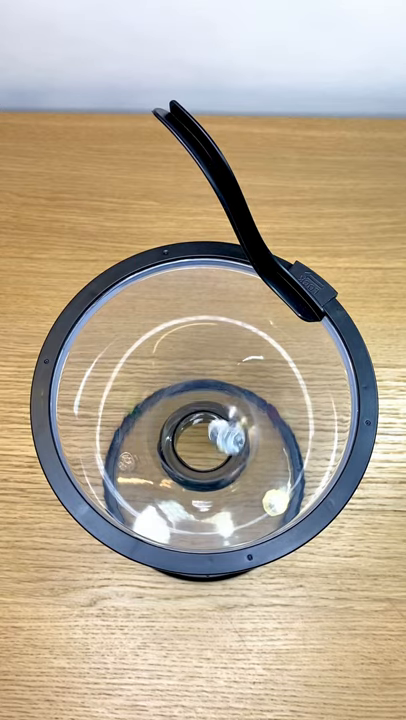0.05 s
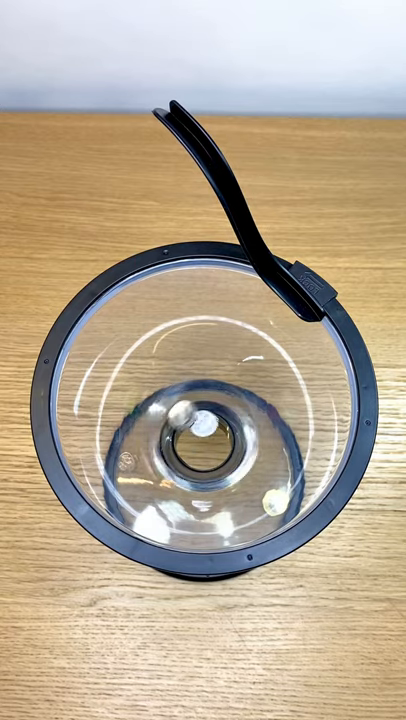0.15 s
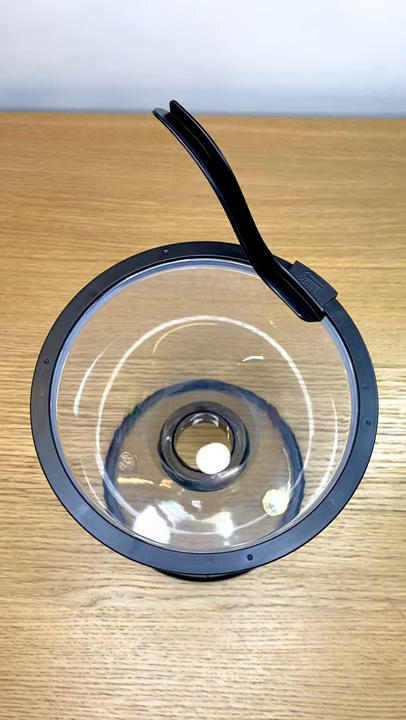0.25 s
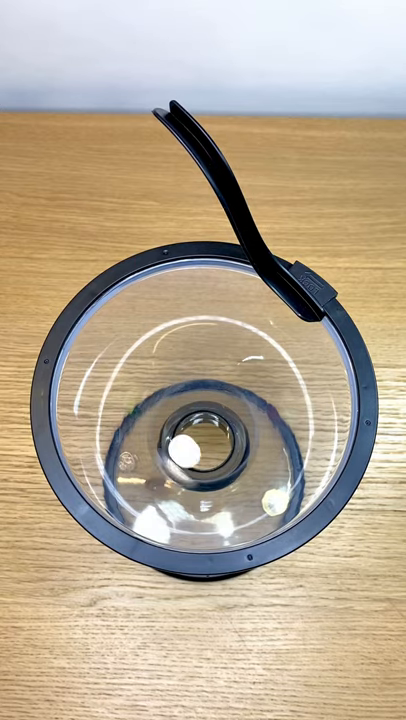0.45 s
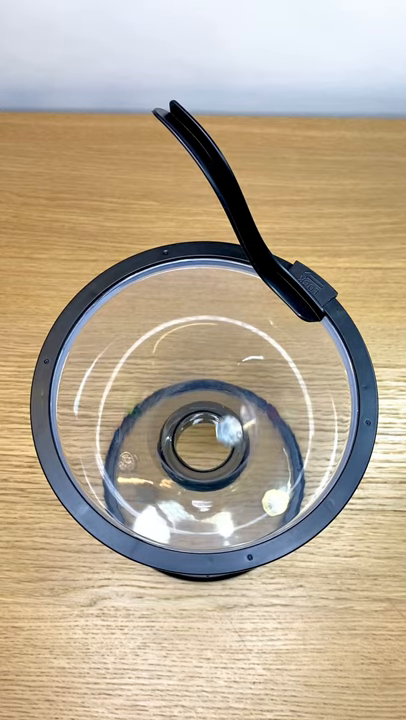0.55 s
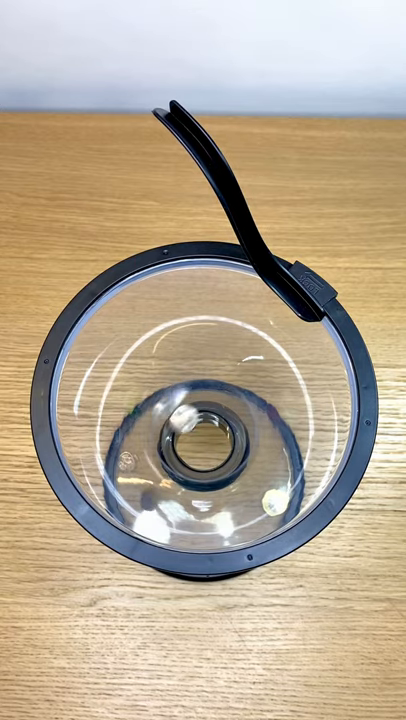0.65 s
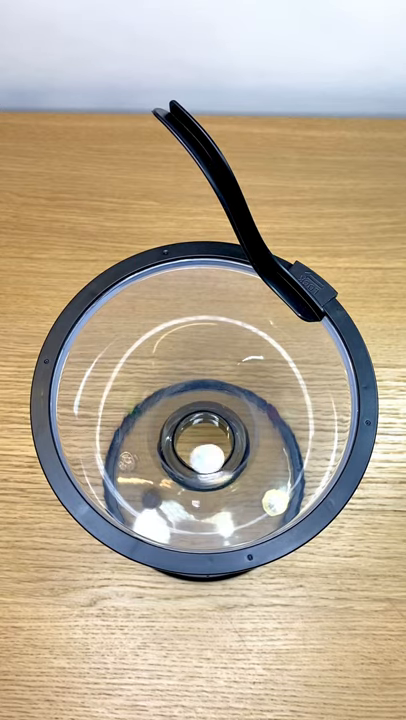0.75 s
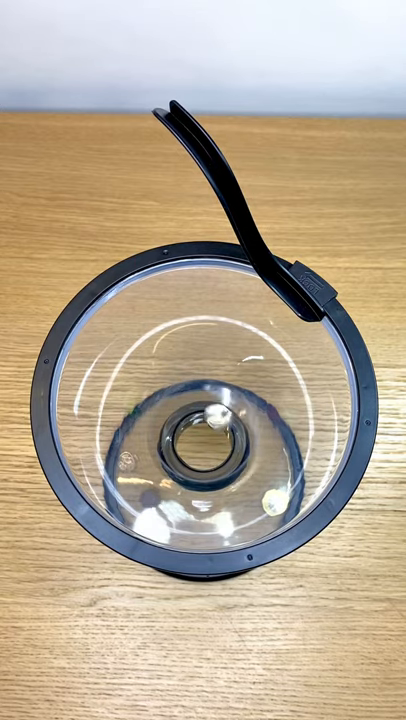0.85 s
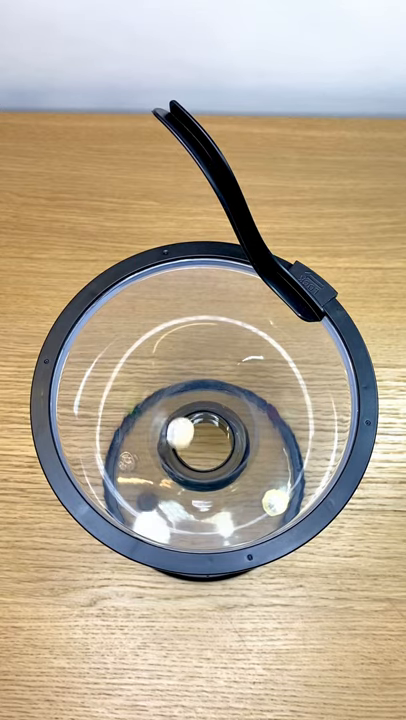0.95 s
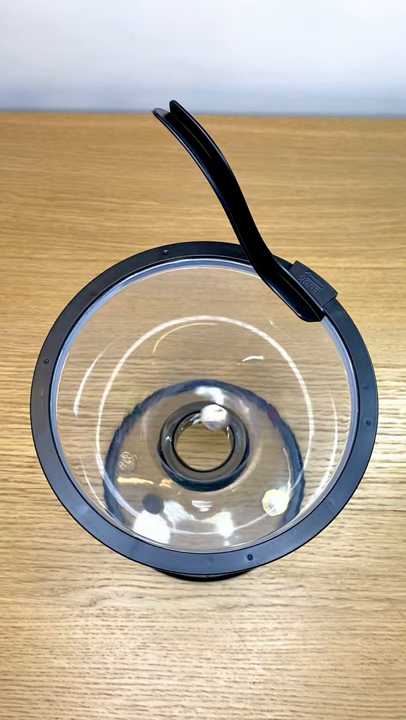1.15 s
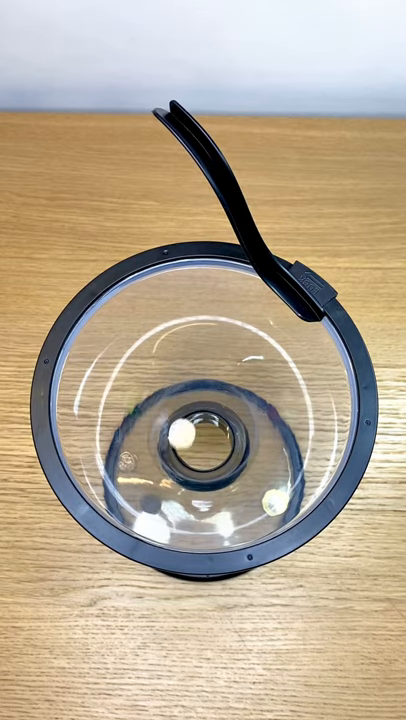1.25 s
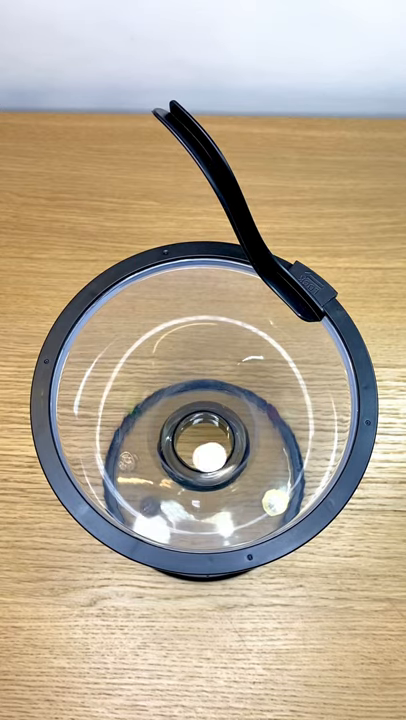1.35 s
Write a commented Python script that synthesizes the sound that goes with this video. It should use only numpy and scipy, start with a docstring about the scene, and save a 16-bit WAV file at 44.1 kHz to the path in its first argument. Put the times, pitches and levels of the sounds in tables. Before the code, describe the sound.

Steady rasping whirr of a coin circling in a plastic funnel, clicks, then a table thud.

```python
"""On a wooden table in a room, a coin circles the throat of a plastic funnel bank.
Rim contacts, as random impulses, drive resonant modes that whirr and sing; the coin rasps once per turn
and wobbles, with a gliding low hum. Early on the plastic clicks sharply, then the bank knocks on the
table: blows ring the modes with decaying noise bands, and the table top booms as decaying cosines."""
import sys
import numpy as np
from scipy import signal
from scipy.fft import rfft, irfft
from scipy.io import wavfile
from scipy.ndimage import uniform_filter1d, map_coordinates

SR = 44100
rng = np.random.default_rng(int(sys.argv[2]) if len(sys.argv) > 2 else 0)


def digitize_waveform(pressure):
    """Quantize a signal to 16-bit integers and store it at the path in sys.argv[1].

    Rows of a 2-D input are taken as channels; values are limited to [-1, 1].
    """
    field = np.atleast_2d(pressure).T
    bounded = np.clip(field, -1, 1)
    quanta = np.round(bounded * 32767).astype(np.int16)
    wavfile.write(sys.argv[1], SR, quanta)


N = 61739
T = np.arange(N) / SR

# Diffuse reflections of the room
ROOM_DB, ROOM_T60_S, ROOM_LOW_HZ = -8, 0.07, 292
ROOM_TREBLE_DB, ROOM_TREBLE_HZ = -0.5, 2000   # slight loss above this corner

# Modes of the table top: mode_hz, t60_s, level_db
TABLE_MODES = [(102.8, 0.41, -8), (117.9, 0.58, -19), (126.8, 0.32, -17), (284.2, .12, -16)]
# Blows that set the table booming: start_s, level_db
BOOMS = [(.155, -34.5), (0.233, -29.5), (0.3584, 2)]
BOOM_RISE_S = 0.01348
# Spectrum of the table's rumble under the rolling: frequency_hz, density_db (per Hz)
RUMBLE_SPECTRUM = [(30, -34), (65, -24), (92, 7.5), (130, -5.5), (160, -21.5), (200, -5.5), (300, -25.5)]
RUMBLE_DB = -50

# Funnel modes: mode_hz, t60_s (ringing freely), rolling_db, click_db, knock_db
FUNNEL_MODES = [(584, 0.2, -8.5, -36.5, -9.5), (687.4, 0.13, -10.5, -18, -8.5),
                (871.8, 0.2, -11.5, -23.5, -45), (966.5, 0.14, -9.5, -36, -14),
                (1060, 0.21, -42, -36, -11.5), (1187, 0.023, -23, -45, -1), (1842, 0.075, -11, -49, -34),
                (1919.5, 0.072, -2.5, -36, -34), (2028, 0.047, -5.5, -33, -28),
                (2331, 0.1, -12.5, -13, -38), (2638, 0.088, -18.5, -13.5, -25), (2876, 0.026, -23, -2, 1.5),
                (3086, 0.046, -16.5, -37, -5), (4080, 0.033, -22.5, -7, -21), (4590, 0.034, -18, -8, -27),
                (5346, 0.021, -30.5, -3, -18), (6464, 0.015, -32, 1.5, -6), (7260, 0.018, -36, -11, -26),
                (9750, 0.033, -43, -13, -18)]

# Sharp clicks on the plastic: start_s, level_db, hardness_hz (contact low-pass corner)
CLICKS = [(.1392, -23.5, 9150), (.1655, -22, 2000), (.2277, -10.5, 15000), (.2503, -17, 4950),
          (.2522, -14.5, 4440)]
# Spectrum of the short modes in a click: frequency_hz, density_db (per Hz)
CLICK_SPECTRUM = [(200, -15), (1300, -26), (2400, 10), (3500, -1.5), (5800, -1.5), (7800, -4), (10000, 1.5),
                  (14000, -25)]
CLICK_T60_S, CLICK_TAIL_DB, CLICK_TAIL_T60_S = 0.021, -35, 0.093   # decays at 2 kHz
# Knocks of the bank on the table: start_s, level_db, hardness_hz (contact low-pass corner)
KNOCKS = [(.3542, -14.5, 5960), (.3635, -19.5, 3540), (.3745, -20, 1200), (.5048, -20.5, 1510),
          (.5122, -20, 1818), (.5187, -26.5, 1490), (.5885, -28.5, 1500)]
# Spectrum of the short modes in a knock: frequency_hz, density_db (per Hz)
KNOCK_SPECTRUM = [(60, -8), (280, -2), (750, -1.5), (1200, 2.5), (2300, -4.5), (2950, -5), (4300, -10.5),
                  (6000, -11), (10000, -11.5), (14000, -31)]
KNOCK_T60_S, KNOCK_TAIL_DB, KNOCK_TAIL_T60_S = 0.038, -8, 0.29   # decays at 2 kHz
DAMPING_SLOPE = 0.37   # ring time falls with frequency by this power
CRACK_DB, CRACK_S = -16, 0.0032   # added level and length of the first contact
THICKET_DB = -1.5   # the short modes of a blow, against the main ones

# Contact of the rolling rim: time_s, whirr_db, treble_db (before the rasps and other offsets)
ROLL = [(0, -37.5, -39.5), (.13, -35, -37.5), (.165, -38, -32), (.205, -39, -45), (.27, -40, -35),
        (.34, -42, -41.5), (.47, -38.5, -42.5), (.6, -37, -42), (.8, -37, -43), (1.0, -39.5, -42.5),
        (1.08, -37, -44.5), (1.4, -40, -43)]
# Level of the singing mode near 2 kHz, before its mode level and wobble: time_s, level_db
SING = [(0, -32.5), (.07, -31.5), (.11, -43), (.17, -34), (.32, -39.5), (.44, -37), (.49, -33.5),
        (.58, -37.5), (.66, -36.5), (.76, -42.5), (.88, -35.5), (.93, -44), (.964, -27.5), (.98, -37),
        (1.036, -46), (1.058, -26), (1.076, -31.5), (1.094, -26), (1.125, -50), (1.19, -33), (1.328, -40),
        (1.347, -28.5), (1.365, -39.5), (1.4, -32.5)]
# Rate at which the coin wobbles on its rim: time_s, rate_hz
WOBBLE = [(0, 32), (.3, 34), (.8, 36.2), (1.12, 29.5), (1.4, 30.6)]
# Pitch of the low hum as the coin goes round: time_s, pitch_hz
HUM = [(0, 623.4), (.12, 590), (.25, 678), (.33, 600), (.7, 575), (.775, 632), (.82, 588), (.88, 634.4),
       (1.07, 623), (1.14, 577.8), (1.18, 628.3), (1.26, 578), (1.4, 625)]
# Brief changes in the rim's scraping: time_s, treble_change_db (negative is softer)
SCRAPES = [(.484, 3), (0.995, -2.5), (1.09, 7.5), (1.228, 2.5)]
# Spectrum of rolling noise through the dense modes: frequency_hz, density_db (per Hz)
WHIRR_SPECTRUM = [(40, -46), (150, -16), (290, -15), (410, -0.5), (520, -5.5), (700, -1.5), (950, -0.5),
                  (1350, -5.5), (1700, 1.5), (2200, -23), (2800, -18), (4000, -22.5), (12000, -52)]
# Spectrum of the rasping treble: frequency_hz, density_db (per Hz)
RASP_SPECTRUM = [(1200, -54), (2300, 4), (3200, 0), (4400, 0.5), (5600, -1.5), (7200, -7), (9500, -9),
                 (11000, -11), (12300, -40), (16000, -66)]
TURN_S, TURN_AT_S = .0585, .872   # one turn of the coin; onset of one rasp
RASP_S, RASP_DB = 0.0072, 6   # a rasp peaks after half this time; its lift above the level between rasps
WOBBLE_DB, SING_WOBBLE_DB, WOBBLE_LAG_S = 4, 4.5, 0.0084   # the singing mode sways more deeply
GRAINS_PER_S, GRAIN_SPREAD_DB = 9000, 3
SCRAPE_LENGTH_S = 0.0095   # from the middle of a change in scraping to 1/e of it
CONTACT_DB, CONTACT_STEP_S = 0.3, .02   # uneven contact of the rim
HUM_DB, HUM_FLUTTER_DB, HUM_JITTER_HZ = -3.5, 3, 7
SING_ABOVE_HZ, SING_BELOW_HZ, GLINT_ABOVE_HZ = 1885, 1970, 2200
GLINT_DB, GLINT_SPREAD_DB = 4, 5.5   # high modes follow the treble, each flaring by chance
DRIVEN_T60_SHARE = 0.55   # share of the free ring time used in each of the two passes
WAVER_SHARE, WAVER_S, WAVER_AT_S = 0.017, .16, 1.012   # pitch waver: depth, period, moment of a crest
LOW_MODES_BELOW_HZ = 800   # these waver twice as fast

# Phase lead of the left port over the right: frequency_hz, phase_rad
PORT_PHASE = [(0, 0), (750, -.4), (1600, .1), (2500, .9), (4000, .8), (4650, 2.1), (5250, 5.9), (5700, 6.8),
              (9650, 8.5), (16000, 10.2)]
# Level of the left port over the right: frequency_hz, difference_db
PORT_BALANCE = [(100, -0.5), (500, 2), (1000, -0.5), (2000, -1.5), (4000, -2.5), (12000, 0.5)]
LOW_CUT_HZ, CUTOFF_HZ = 55, 16300


def from_db(db):
    """Decibel law: 20 dB is a factor of ten in amplitude."""
    return 10 ** (np.asarray(db) / 20)


def rms_one(x):
    """Power normalization: scale to unit rms."""
    return x / np.sqrt(np.mean(x ** 2) + 1e-20)


def in_time(rows):
    """Linear interpolation: each column of a curve at every sample."""
    s, *columns = np.transpose(rows)
    return [np.interp(T, s, c) for c in columns]


def at_hz(points, hz):
    """Logarithmic frequency scale: interpolate a spectrum along it."""
    f, value = np.transpose(points)
    return np.interp(np.log(hz + 1), np.log(f + 1), value)


def chance(step_s):
    """Random modulation: a curve of spread about 1 with a new value every step."""
    return np.interp(T / step_s, np.arange(N), rng.standard_normal(N))


def filtered(x, order, corner_hz, kind):
    """Butterworth filtering: a maximally flat passband."""
    return signal.sosfilt(signal.butter(order, corner_hz, kind, fs=SR, output="sos"), x)


def coloured(x, spectrum):
    """Spectral shaping: weight a steady noise by frequency, at unit rms."""
    return rms_one(irfft(rfft(x) * from_db(at_hz(spectrum, np.fft.rfftfreq(N, 1 / SR))), N))


def evened(x, size=2200):
    """Envelope normalization: hold the slow level at 1, keep the fast flutter."""
    return x / np.sqrt(uniform_filter1d(x * x, size) + 1e-20)


def ring(drive, hz, t60):
    """Damped resonance: a unit impulse rings one mode as a decaying sine of height 1."""
    r, w = from_db(-60 / (t60 * SR)), 2 * np.pi * hz / SR
    return signal.lfilter([0, np.sin(w)], [1, -2 * r * np.cos(w), r * r], drive + 1e-18)


def dying(s, t60):
    """Exponential decay: an envelope from s that falls 60 dB in t60."""
    return (T >= s) * np.exp(-np.log(1000) * np.maximum(T - s, 0) / t60)


def room(x):
    """Diffuse reverberation: convolution with independent decaying noise on each side."""
    tails = rng.standard_normal((2, N)) * dying(0.0046, ROOM_T60_S)
    tails = filtered(tails, 2, ROOM_LOW_HZ, "high")
    tails /= np.linalg.norm(tails, axis=1, keepdims=True)
    tails += (from_db(ROOM_TREBLE_DB) - 1) * filtered(tails, 1, ROOM_TREBLE_HZ, "high")
    return from_db(ROOM_DB) * signal.fftconvolve(x[None], tails, axes=1)[:, :N]


def table_top():
    """Plate resonance: blows excite low modes that swell and decay over a faint, steady rumble."""
    out = from_db(RUMBLE_DB) * evened(coloured(rng.standard_normal(N), RUMBLE_SPECTRUM), size=5000)
    for s, db in BOOMS:
        age = np.maximum(T - s, 0)
        rise = 1 - np.exp(-(age / BOOM_RISE_S) ** 2)
        for hz, t60, mode_db in TABLE_MODES:
            mode = np.cos(2 * np.pi * hz * (age - BOOM_RISE_S))
            out += from_db(db + mode_db) * rise * dying(s, t60) * mode
    return out


def crack(s):
    """Impact contact: a brief added pulse at the start of a blow."""
    return from_db(CRACK_DB) * (T >= s) * np.exp(-((T - s) / CRACK_S) ** 4)


def blows(rows, spectrum, t60, tail_db, tail_t60, mode_dbs):
    """Impulsive excitation: main modes ring amid a thicket of short ones, as noise dying faster in treble."""
    edges = np.geomspace(50, 17000, 24)
    centres = np.sqrt(edges[1:] * edges[:-1])
    gains = from_db(at_hz(spectrum, centres)) * np.sqrt(np.diff(edges))
    gains /= np.linalg.norm(gains)
    out, taps = np.zeros(N), np.zeros(N)
    for low, high, hz, gain in zip(edges, edges[1:], centres, gains):
        thicket = evened(filtered(rng.standard_normal(N), 2, [low, high], "band"), size=600)
        shorter = (hz / 2000) ** -DAMPING_SLOPE
        power = np.zeros(N)
        for s, db, _ in rows:
            tail = from_db(tail_db) * dying(s, tail_t60 * shorter)
            envelope = crack(s) + dying(s, t60 * shorter) + tail
            power += (from_db(db) * envelope) ** 2
        out += from_db(THICKET_DB) * gain * thicket * np.sqrt(power)
    for s, db, hardness_hz in rows:
        impulse = signal.unit_impulse(N, int(s * SR)) + 1e-18
        taps += from_db(db) * filtered(impulse, 2, min(hardness_hz, CUTOFF_HZ), "low")
    for k, (mode, db) in enumerate(zip(FUNNEL_MODES, mode_dbs)):
        # neighbouring modes start with opposite sign
        out += (-1) ** k * from_db(db) * ring(taps, mode[0], mode[1])
    return out


def grains():
    """Rough rolling contact: random impulses where the milled rim touches the plastic."""
    sizes = from_db(GRAIN_SPREAD_DB * np.minimum(rng.exponential(1, N), 4))
    signs = rng.choice([-1, 1], N)
    return sizes * signs * (rng.random(N) < GRAINS_PER_S / SR)


def driven_mode(hz, t60):
    """Forced resonance: grains pass twice through one mode, for steeper skirts, and its pitch wavers."""
    pass_t60 = t60 * DRIVEN_T60_SHARE
    # the first pass of the repeated grains lets the mode build up
    tone = ring(ring(np.tile(grains(), 2), hz, pass_t60), hz, pass_t60)[N:]
    tone = evened(tone, size=500 if SING_ABOVE_HZ < hz < SING_BELOW_HZ else 2200)
    speed = 2 * np.pi / WAVER_S * (2 if hz < LOW_MODES_BELOW_HZ else 1)
    wavering = T + WAVER_SHARE / speed * np.sin(speed * (T - WAVER_AT_S))
    return map_coordinates(tone, [wavering * SR], order=3, mode="mirror")


def rolling_coin():
    """Rolling excitation: a low hum glides, one mode sings, high modes glint with each rasp."""
    whirr_db, treble_db = in_time(ROLL)
    sing_db, = in_time(SING)
    wobbles_per_s, = in_time(WOBBLE)
    hum_hz, = in_time(HUM)
    since = (T - TURN_AT_S) % TURN_S / RASP_S
    rasp = 2 * since * np.exp(1 - 2 * since)
    rasp_db = RASP_DB * (rasp - rasp.mean())
    for s, change_db in SCRAPES:
        treble_db = treble_db + change_db * np.exp(-((T - s) / SCRAPE_LENGTH_S) ** 2)
    wobble = np.cos(2 * np.pi * (np.cumsum(wobbles_per_s) / SR - wobbles_per_s * WOBBLE_LAG_S))
    swaying_db = whirr_db + WOBBLE_DB * wobble

    out = coloured(grains(), WHIRR_SPECTRUM) * from_db(whirr_db + 0.56 * rasp_db - 1.5)
    uneven_db = CONTACT_DB * chance(CONTACT_STEP_S)
    out += coloured(grains(), RASP_SPECTRUM) * from_db(treble_db + rasp_db + uneven_db)
    jittered_hz = hum_hz + HUM_JITTER_HZ * chance(CONTACT_STEP_S)
    hum_db = swaying_db + HUM_DB + HUM_FLUTTER_DB * chance(CONTACT_STEP_S)
    out += np.sin(2 * np.pi * np.cumsum(jittered_hz) / SR) * from_db(hum_db)
    for hz, t60, db, _, _ in FUNNEL_MODES:
        if hz < SING_ABOVE_HZ or SING_BELOW_HZ < hz < GLINT_ABOVE_HZ:
            level_db = swaying_db
        elif hz < SING_BELOW_HZ:
            level_db = sing_db + SING_WOBBLE_DB * wobble
        else:
            flare_db = GLINT_SPREAD_DB * chance(CONTACT_STEP_S)
            level_db = treble_db + GLINT_DB + rasp_db + flare_db
        out += driven_mode(hz, t60) * from_db(db + level_db)
    return out


def scene():
    """Superposition: the funnel, its reflections in the room and the table add linearly."""
    _, _, _, click_dbs, knock_dbs = np.transpose(FUNNEL_MODES)
    funnel = rolling_coin()
    funnel += blows(CLICKS, CLICK_SPECTRUM, CLICK_T60_S, CLICK_TAIL_DB, CLICK_TAIL_T60_S, click_dbs)
    funnel += blows(KNOCKS, KNOCK_SPECTRUM, KNOCK_T60_S, KNOCK_TAIL_DB, KNOCK_TAIL_T60_S, knock_dbs)
    return funnel + room(funnel) + table_top()


def record(dry):
    """Two-port reception: ports differ in phase and level; bass is cut, peaks rounded, the top cut."""
    hz = np.fft.rfftfreq(2 * N, 1 / SR)
    phase = np.interp(hz, *np.transpose(PORT_PHASE))
    lean = from_db(at_hz(PORT_BALANCE, hz) / 2)
    ports = np.array([lean, np.exp(-1j * phase) / lean])
    heard = irfft(rfft(dry, 2 * N) * ports)[:, :N]
    rounded = np.tanh(filtered(heard, 3, LOW_CUT_HZ, "high"))
    return signal.sosfilt(signal.cheby2(12, 70, CUTOFF_HZ, fs=SR, output="sos"), rounded)


dry = scene()
out = record(dry)
digitize_waveform(out)
```